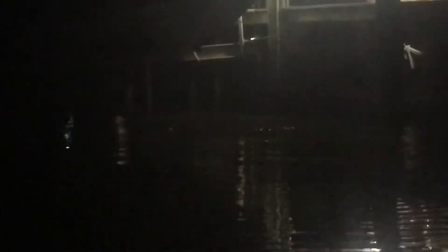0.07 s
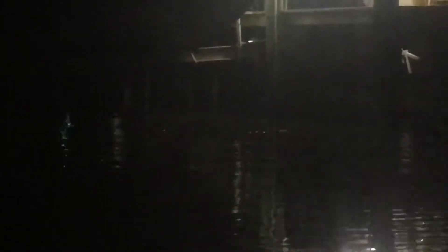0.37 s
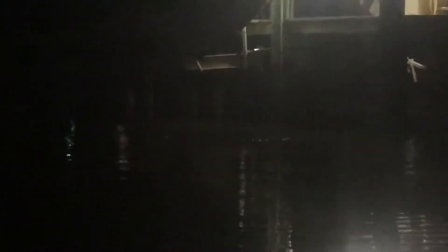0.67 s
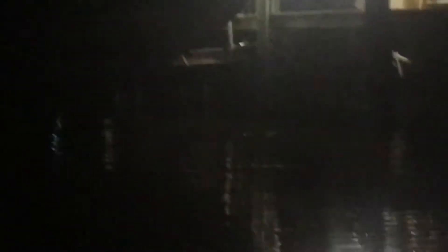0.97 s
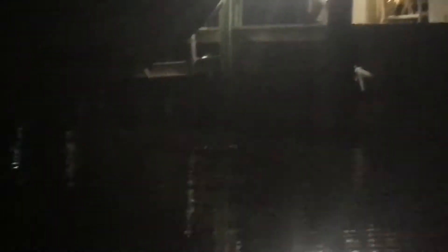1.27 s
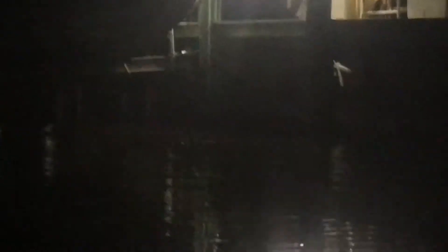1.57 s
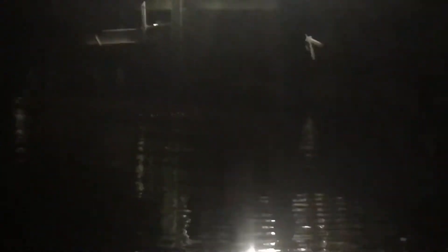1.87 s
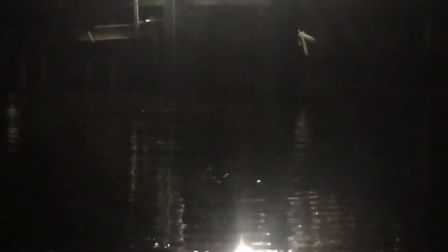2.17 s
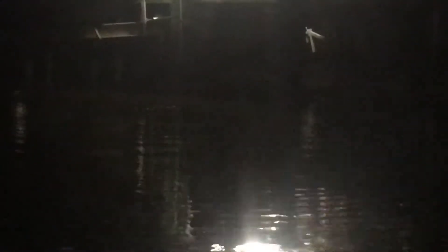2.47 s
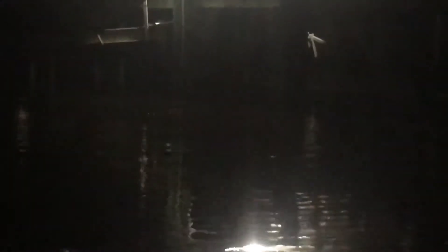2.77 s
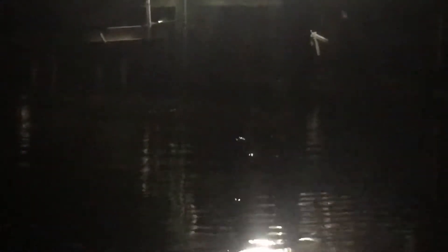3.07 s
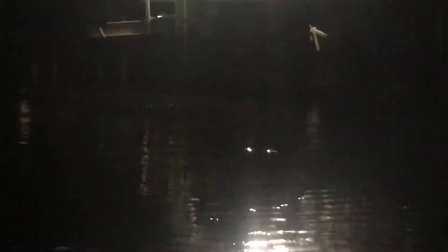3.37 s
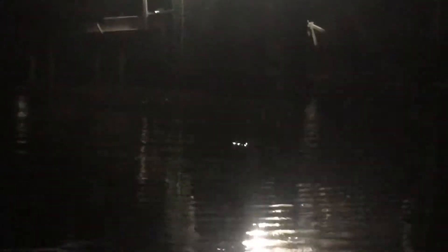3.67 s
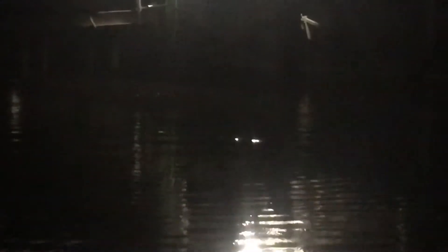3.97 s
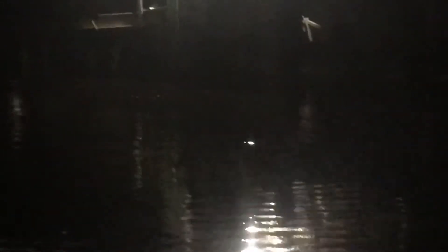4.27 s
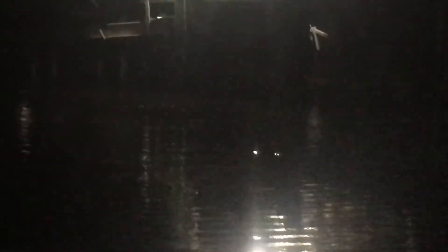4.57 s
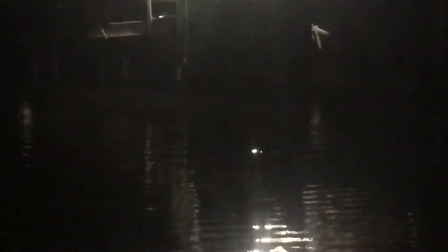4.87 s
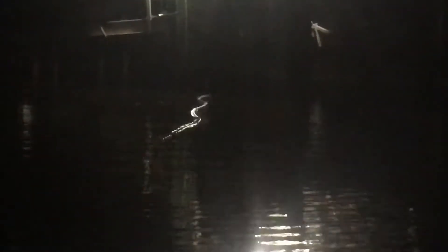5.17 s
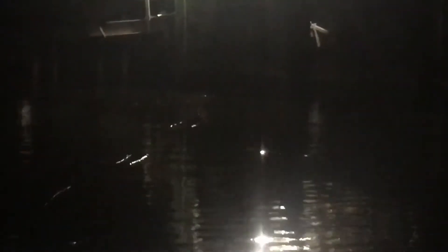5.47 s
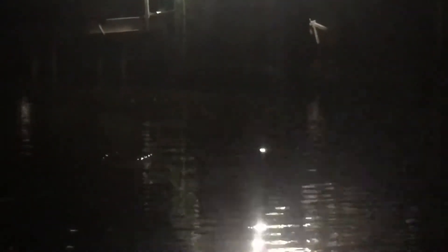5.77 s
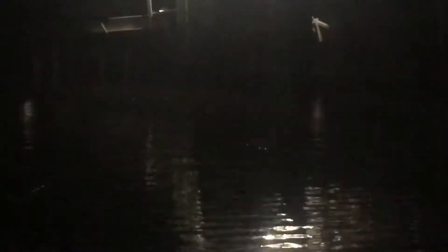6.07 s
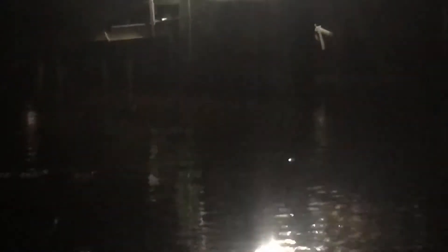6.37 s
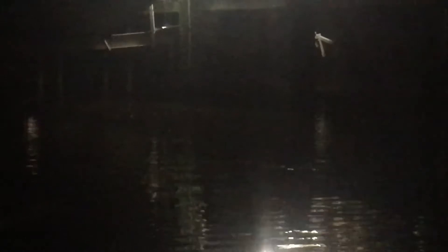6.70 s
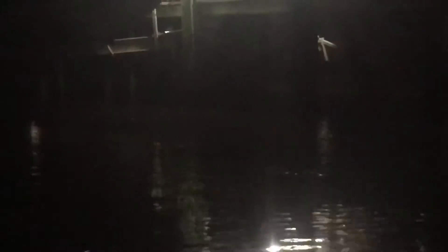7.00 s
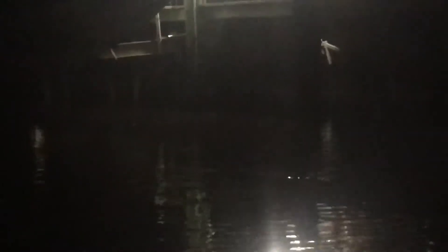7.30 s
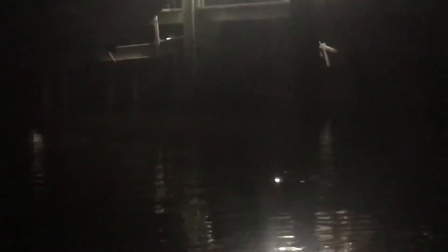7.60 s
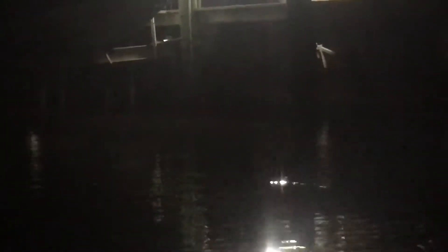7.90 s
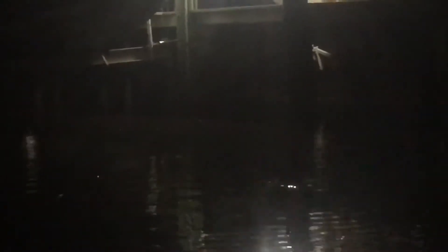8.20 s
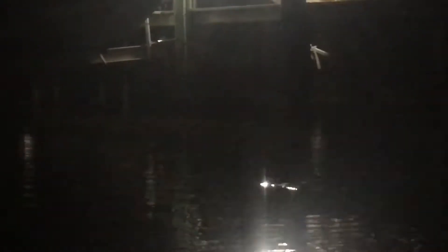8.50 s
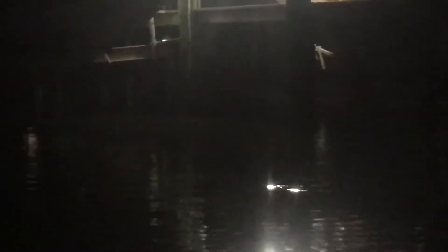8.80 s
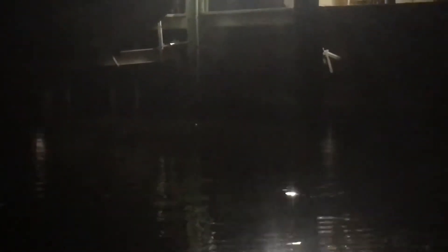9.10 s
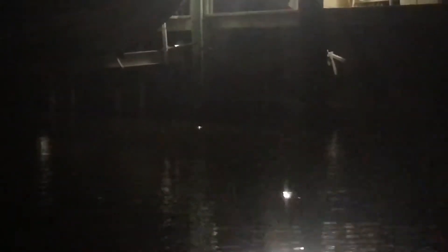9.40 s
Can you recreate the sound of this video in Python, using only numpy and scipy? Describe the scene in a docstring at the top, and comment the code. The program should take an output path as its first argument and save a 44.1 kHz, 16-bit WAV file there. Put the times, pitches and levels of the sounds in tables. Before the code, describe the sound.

A quiet night beside calm water, with a low, gently swelling distant rumble, faint hum and microphone hiss throughout. For the first 1.8 seconds fingers rub, bump and knock on the hand-held microphone; a sharp knock at about 1.15 seconds is by far the loudest sound. From 1.5 seconds a fly line swishes softly through the air, with a very faint hiss through the rod's rings. The rod gives a low whoosh at 2.3 seconds, followed by the line's airy rush. More swishes come between 3.2 and 3.6 seconds. At 4 seconds the rod whooshes again and the line shoots out with a short, rising, breathy whistle. Faint tackle ticks and light water pats then scatter through the rest, while a far drone swells slightly, fading after 7 seconds. Dull hand bumps return from 6.3 to 7 seconds, and one faint, quick swish passes near 9.4 seconds.

```python
"""Fly casting at night beside calm water. First, fingers bump, rub and knock on the hand-held camera.
From 1.5 s the line swishes and hisses through the rod's rings, and the rod whooshes at 2.3 s and 4 s:
both shed little whirls of air, which whistle higher the faster they move. Then the line shoots out,
faint ticks begin and a far drone swells. The hand shifts again at 6-7 s; a last swish comes near 9.4 s.
Under it all lie a low distant rumble, a faint hum and microphone hiss."""
import sys
import numpy as np
from scipy import signal
from scipy.fft import rfft, irfft
from scipy.io import wavfile
from scipy.ndimage import map_coordinates

SR = 44100
rng = np.random.default_rng(int(sys.argv[2]) if len(sys.argv) > 2 else 0)


def materialize(psi):
    """Save the field psi as 16-bit PCM at rate SR to the path in sys.argv[1].

    A 1-D psi becomes a single channel; in a 2-D psi each row is a channel.
    """
    bounded = np.clip(np.atleast_2d(psi).T, -1, 1)
    quanta = np.round(bounded * 32767).astype(np.int16)
    wavfile.write(sys.argv[1], SR, quanta)


N = 425565
T = np.arange(N) / SR

# forward strokes of the rod, at top speed: t/s, f/Hz, level/dB
FORWARD_STROKES = [(2.256, 394, -41.5), (4.032, 378, -44.5)]
# parts of the rod, thick to thin: delay/s, pitch ratio, relative level/dB, fade/s, width/share of pitch
ROD_SECTIONS = [(0, 1, 0.5, 0.038, .3), (.004, 1.33, -6.5, 0.076, .34), (.012, 2.75, -11.5, .06, 0.94),
                (.06, 5.4, -25, .06, .7)]
# the line whipping past, at its closest: t/s, rise/s, f/Hz, glide/(octaves per s), level/dB
LINE_SWEEPS = [(1.55, 0.051, 1300, 10, -51.5), (2.355, 0.059, 1306, 4, -51),
               (3.25, .055, 1197, 13.5, -53.5), (3.278, .026, 2196, 2.5, -57),
               (3.47, 0.04, 2590, 11.5, -66), (3.54, 0.045, 3510, 2, -71), (4.137, .045, 1297, 10.5, -58),
               (4.585, .055, 3450, -5, -73), (9.352, 0.026, 1103, 27.5, -60)]
# loops of line unrolling: t/s, rise/s, fade/s, f/Hz, glide/(octaves per s), level/dB
LINE_LOOPS = [(1.745, 0.13, 0.15, 1272, 1.44, -59.5), (2.489, 0.088, 0.17, 1449, 1, -57.5),
              (3.17, .21, 0.17, 1520, 0.72, -61.5), (3.48, 0.16, 0.17, 1559, -1.1, -60.5),
              (3.54, 0.056, .08, 725, -1.5, -65), (4.48, 0.097, 0.15, 1422, .6, -60.5)]
# whistle of the line shooting out on the last cast: t/s, f/Hz, level/dB
SHOOT_WHISTLE = [(4.19, 1343, -66), (4.258, 1265, -50.5), (4.33, 1346, -49.5), (4.41, 1812, -58.5),
                 (4.53, 2695, -81)]
# peaks in the hiss of the guides (the rings on the rod): f/Hz, width/Hz, relative level/dB
GUIDE_PEAKS = [(1480, 1500, 13), (2970, 3300, 3), (5730, 890, 10.5), (8250, 2400, 6.5), (9800, 1400, -32),
               (12300, 2700, -2)]
# pulls of line through the guides: t/s, length/s, level/dB
LINE_PULLS = [(1.16, 0.17, -71), (2.31, 0.16, -68), (2.56, .42, -67), (3.07, 0.21, -72),
              (3.45, 0.24, -74.5), (4.06, 0.033, -68), (4.6, 0.21, -71.5)]
# zips as the line speeds up or slows in the guides: t/s, length/s, start f/Hz, end f/Hz, level/dB
LINE_ZIPS = [(1.784, 0.08, 10000, 8000, -73), (2.315, 0.058, 8050, 8950, -65.5),
             (2.425, 0.15, 10500, 5670, -69.5), (3.544, 0.14, 5840, 4830, -73),
             (3.58, 0.13, 10100, 8450, -72), (4.141, 0.035, 7900, 3200, -68)]

# fingertips dragging on the camera case: t/s, length/s, level/dB
FINGER_RUBS = [(.92, 0.126, -52), (1.045, 0.1, -46), (1.1265, 0.028, -43), (1.213, 0.034, -48)]
# tone of the rubbing fingertips: f/Hz, relative level/dB
FINGER_TONE = [(250, -21), (400, -13.5), (520, -0.5), (660, -4.5), (830, -15), (1120, -28), (1500, -7.5),
               (1950, -12), (2550, -19), (4100, -21.5), (6000, -26), (9400, -32), (15000, -54.5)]
# the palm shifting: t/s, length/s, rub level/dB, judder level/dB, rate/(slips per s), firmness f/Hz
PALM_SHIFTS = [(0.223, 0.042, -60.5, -42, 30, 250), (0.611, 0.35, -56, -38, 35, 266),
               (1.565, 0.25, -65, -40.5, 27, 195), (6.328, .09, -67, -48, 29, 199),
               (6.842, 0.13, -62.5, -39.5, 31, 200)]
# tone of the rubbing palm: f/Hz, relative level/dB
PALM_TONE = [(70, -6), (130, 3), (300, 7), (550, -4.5), (800, -61), (2500, -60)]
# knocks on the case: t/s, level/dB, brightness/(dB per octave)
CASE_KNOCKS = [(0.584, -45, -3), (0.6967, -27, -7.5), (0.858, -29, -20), (1.0225, -31.5, -4.5),
               (1.037, -26.5, -0.5), (1.081, -64, 8), (1.1268, -20.5, -3.5), (1.1527, -7.5, 0.5),
               (1.2457, -29, -2), (1.741, -35, -6.5), (6.601, -41, -21)]
# notes at which the case rings: f/Hz, relative level/dB, time to fade by 60 dB/s
CASE_NOTES = [(506, -3.5, 0.032), (655, -6, 0.012), (910, -18.5, 0.023), (1560, -3.5, 0.0042),
              (2040, -6.5, 0.0076), (3150, -7.5, 0.0049), (4240, -9, 0.0022), (7170, -18.5, 0.0027),
              (11300, -21, 0.0012)]
# single bumps of the hand (firmer is brighter): t/s, level/dB, firmness f/Hz
HAND_BUMPS = [(0.2265, -34, 290), (.385, -33.5, 149), (0.584, -28, 370), (0.853, -37, 164),
              (1.02, -39.5, 264), (1.149, -38, 256), (1.486, -36.5, 111), (3.198, -35, 473),
              (3.517, -43.5, 240), (4.673, -42, 220), (6.362, -36, 158), (6.519, -40, 119),
              (6.649, -35.5, 148), (6.735, -38, 160), (6.876, -30.5, 223), (7, -36.5, 137)]

# dry ticks of the fishing tackle: t/s, level/dB, relative snap level/dB
TACKLE_TICKS = [(1.407, -58, 0), (3.944, -56.5, -7), (4.215, -53, -11), (5.212, -58.5, -4),
                (5.513, -55, -9), (5.815, -59, -4), (6.1123, -52.5, -5.5), (6.393, -53, -10),
                (6.627, -59, -13), (6.934, -55, -9), (7.913, -56.5, -11), (8.212, -56, -6),
                (8.378, -61, -4), (9.413, -56, -13)]
# soft pats of line and water: t/s, level/dB, f/Hz, decay/s
WATER_PATS = [(0.3697, -49.5, 1790, 0.0027), (3.048, -50, 1810, 0.0029), (4.792, -48, 1480, .012),
              (4.7948, -53.5, 2830, 0.011), (6.422, -47, 1780, 0.0054), (6.435, -61, 1820, 0.058),
              (7.004, -62, 1800, .013), (9.206, -59, 1620, 0.016), (9.225, -57, 780, 0.0094)]
# tone of the low rumble: f/Hz, relative level/dB
RUMBLE_TONE = [(20, -33.5), (32, -9), (43, 1), (60, 0), (85, -8.5), (120, -12.5), (180, -24.5), (400, -50),
               (1000, -68)]
# swells of that rumble: t/s, half length/s, added level/dB
RUMBLE_SWELLS = [(.2, .2, 6.5), (0.727, 0.34, 4), (1.493, 0.16, 12), (2.05, 0.2, 6.5), (2.703, 0.22, 5),
                 (3.687, 0.12, 7.5), (4.374, 0.046, 6), (6.8, .3, 4.5), (7.72, 0.13, 7.5), (8.455, 0.31, 4),
                 (9.348, 0.25, 4.5)]
# tone of the far-off low noise: f/Hz, relative level/dB
DISTANT_TONE = [(70, 3.5), (130, 2), (190, -3), (280, -4.5), (340, -5), (430, -19), (800, -31), (3000, -61)]
# loudness of the far-off drone: t/s, level/dB
DRONE_LEVELS = [(0, -86), (4.1, -70), (4.4, -60), (5.5, -61.5), (7, -61), (8.2, -71.5), (9.65, -76.5)]
# tone of the microphone hiss: f/Hz, relative level/dB
HISS_TONE = [(300, 3.5), (550, 3), (850, -0.5), (1500, 1), (2050, 0), (2700, -9.5), (3700, -9.5),
             (4800, -14.5), (6300, -12.5), (9600, -14), (10500, -19), (11300, -13), (13000, -17),
             (16000, -18.5)]


def rod(rise_s=.036, octaves_per_s=1.7):
    """The rod cuts the air: its thick end gives a low whoomp, the thinner parts a higher, later one."""
    out = np.zeros(N)
    for s, hz, db in FORWARD_STROKES:
        for lag, ratio, section_db, fade_s, width in ROD_SECTIONS:
            whoosh(out, s + lag, rise_s + lag / 2, fade_s, hz * ratio, octaves_per_s, db + section_db,
                   width, rush_db=-17, shapes=(1.33, 1.2))
    return out


def line_sweeps(slack_db=-8.5, slack_glide_share=.35):
    """The tight line whips past and stops short; its slack part glides less, so the pitches fan out."""
    out = np.zeros(N)
    for s, rise_s, hz, glide, db in LINE_SWEEPS:
        tight = (glide, db, .26)  # glide, level, width
        slack = (glide * slack_glide_share, db + slack_db, .36)
        for part in (tight, slack):
            whoosh(out, s, rise_s, .9 * rise_s, hz, *part, rush_db=-5, shapes=(1.1, 3))
    return out


def line_loops():
    """After a stroke, the loop of line unrolls with a long soft rush."""
    out = np.zeros(N)
    for loop in LINE_LOOPS:
        whoosh(out, *loop, width=.32, rush_db=-2, shapes=(3.1, 2.1))
    return out


def line_shoot(fray_db_per_s=45):
    """Let go, the line whistles, rises as its loop speeds up and frays into a rush."""
    out = np.zeros(N)
    times, hz, db = np.transpose(SHOOT_WHISTLE)
    t = np.arange(times[0], times[-1], 1 / SR)
    pitch = np.interp(t, times, hz)
    loudness = gain(np.interp(t, times, db))
    rush_db = -16 + fray_db_per_s * (t - times[0])
    add(out, times[0], air_whirls(pitch, loudness, width=.19, rush_db=rush_db))
    return out


def whoosh(out, s, rise_s, fade_s, hz, glide, db, width, rush_db, shapes):
    """Add one pass through the air to out: it swells and fades while its pitch glides."""
    t = np.arange(-3 * rise_s, 3 * fade_s, 1 / SR)
    pitch = hz * 2 ** np.minimum(glide * t, 1)  # at most one octave above hz
    loudness = gain(db) * swell(t, rise_s, fade_s, *shapes)
    add(out, s + t[0], air_whirls(pitch, loudness, width, rush_db))


def air_whirls(hz, loudness, width, rush_db, gust_db=2, gusts_per_s=70):
    """Whirls of air make a tone that follows the speed; parts moving at other speeds add a broad rush."""
    cycles = np.cumsum(np.clip(hz, 150, 6000)) / SR
    tone = breathy_tone(cycles, width) + .5 * breathy_tone(cycles, 2 * width)
    air = unit(steep_band(rng.standard_normal(2 * SR), hz=3000, width=3000))[:len(hz)]
    rush = breathy_tone(cycles, width=.91) + gain(-13) * air
    gusts = gain(gust_db * wander(T[:len(hz)] * gusts_per_s))  # churning air roughens the sound
    sound = (tone + gain(rush_db) * rush) * gusts
    return loudness * sound / np.sqrt(np.average(sound ** 2, weights=loudness ** 2))


def guides(rough_db=2.5, flutters_per_s=90):
    """The line hisses unevenly through the rings of the rod, and zips when its speed changes."""
    noise = rng.standard_normal(N)
    hiss = gain(-22) * band(noise, hz=5000, width=7000)
    hiss += sum(gain(db) * steep_band(noise, hz, width) for hz, width, db in GUIDE_PEAKS)
    flutter = gain(rough_db * wander(T * flutters_per_s))
    out = unit(hiss * flutter) * slides(LINE_PULLS, attack_s=.013, build_db=3, release_s=.049)
    for s, length, start_hz, end_hz, db in LINE_ZIPS:
        cycles = np.cumsum(np.geomspace(start_hz, end_hz, int(length * SR))) / SR
        add(out, s, gain(db) * np.hanning(len(cycles)) * breathy_tone(cycles, width=.34))
    return out


def rubbing(slip_db=3.5, slips_per_s=600, creep_db=4, creeps_per_s=110):
    """Skin catches and slips on the case: fingertips in quick bright bursts, the palm in slow dull ones."""
    fingers = colour(rng.standard_normal(N) * gain(slip_db * wander(T * slips_per_s)), FINGER_TONE)
    fingers *= slides(FINGER_RUBS, attack_s=.0012, build_db=14.5, release_s=.0054)
    palm = colour(rng.standard_normal(N) * gain(creep_db * wander(T * creeps_per_s)), PALM_TONE)
    palm *= slides([row[:3] for row in PALM_SHIFTS], attack_s=.0021, build_db=-1, release_s=.02)
    return fingers + palm


def knocks(low_cut_hz=330):
    """Each knock rings the case, and a harder one reaches higher notes. So small a body gives no bass."""
    out, t = np.zeros(N), T[:SR // 10]
    for s, db, brightness in CASE_KNOCKS:
        for k, (hz, note_db, ring_s) in enumerate(CASE_NOTES):
            octaves_up = np.log2(hz / CASE_NOTES[0][0])
            size = gain(db + note_db + brightness * octaves_up)
            ring = np.sin(2 * np.pi * hz * t) * np.exp(-np.log(1000) * t / ring_s)
            add(out, s, (-1) ** k * size * ring)  # neighbouring notes swing opposite ways
    return keep_side(out, "high", low_cut_hz, order=2)


def bumps(spread_octaves=.46, jitter_s=.002, scatter_db=.5):
    """Single bumps of the hand, and a judder of small ones while the palm sticks and slips."""
    out = np.zeros(N)
    for s, db, firm_hz in HAND_BUMPS:
        add(out, s, thud(db, firm_hz))
    for s, length, _, db, rate, firm_hz in PALM_SHIFTS:
        slip_times = s + np.arange(0, length, 1 / rate)
        for slip_s, (later, louder, firmer) in zip(slip_times, rng.standard_normal((32, 3))):
            slip = thud(db + scatter_db * louder, firm_hz * 2 ** (spread_octaves * firmer))
            add(out, slip_s + jitter_s * later, slip)
    return out


def thud(db, firm_hz, low_cut_hz=62):
    """A push on the case swings from a quick tap down into the bass and soon dies away."""
    push = np.ones(SR // 6)
    swing = keep_side(push, "high", low_cut_hz, order=7)
    sound = keep_side(swing, "low", firm_hz, order=4)
    return gain(db) * sound / np.abs(sound).max()


def ticks_and_pats(snap_db_per_octave=8):
    """The tackle always ticks at one pitch; pats on the water are softer, the higher ones crisper."""
    out = np.zeros(N)
    for s, db, snap_db in TACKLE_TICKS:
        add(out, s, tap(db, hz=2150, decay_s=.003, snap_db=snap_db))
    for s, db, hz, decay_s in WATER_PATS:
        octaves_up = np.log2(hz / WATER_PATS[0][2])
        add(out, s, tap(db, hz, decay_s, snap_db=-17 + snap_db_per_octave * octaves_up))
    return out


def tap(db, hz, decay_s, snap_db, rise_s=.00025):
    """One light tap: a soft ring around one pitch, with a brighter snap."""
    t = T[:SR // 6]
    ring = unit(steep_band(rng.standard_normal(len(t)), hz, width=.33 * hz))
    snap = unit(band(rng.standard_normal(len(t)), hz=4500, width=6500))
    loudness = gain(db) * np.exp(-t / decay_s) * (1 - np.exp(-t / rise_s))
    return loudness * (ring + gain(snap_db) * snap)


def faint_ticks(count=40, first_s=4, scatter_db=4, decay_s=.0081):
    """Tiny uneven ticks, barely above the hiss, from the last cast on."""
    out, t = np.zeros(N), T[:SR // 50]
    for when, size in rng.random((count, 2)):
        tick = rng.standard_normal(len(t)) * np.exp(-t / decay_s)
        add(out, first_s + when * (T[-1] - first_s), gain(-68 + scatter_db * size) * tick)
    return band(out, hz=4200, width=4800) + gain(13) * band(out, hz=2100, width=500)


def night(rumble_db=-55, distant_db=-61.5, hiss_db=-67.5, drone_hz=215):
    """Swelling rumble, far-off low noise, microphone hiss, a far drone and the hum of mains power."""
    swells_db = sum(db * swell(T - s, half, half) for s, half, db in RUMBLE_SWELLS)
    rumble = colour(rng.standard_normal(N), RUMBLE_TONE) * gain(rumble_db + swells_db)
    distant = colour(rng.standard_normal(N), DISTANT_TONE) * gain(distant_db + wander(T * 4))
    hiss = colour(rng.standard_normal(N), HISS_TONE) * gain(hiss_db)
    drone_db = np.interp(T, *np.transpose(DRONE_LEVELS))
    drone = breathy_tone(T * drone_hz, width=.35) * gain(drone_db)
    hum = np.zeros(N)
    for hz, db in [(60, -59), (300, -69)]:
        loudness = gain(db + 2 * wander(T * 2))
        hum += loudness * np.sin(2 * np.pi * hz * T + .5 * wander(T * 2))
    return rumble + distant + hiss + drone + hum


def slides(rows, attack_s, build_db, release_s):
    """Loudness of sliding contacts (t/s, length/s, level/dB): each starts, nears its level and lets go."""
    out = np.zeros(N)
    for s, length, db in rows:
        t = T[:int((length + 5 * release_s) * SR)]
        build = gain(db - build_db * np.maximum(1 - t / length, 0))
        attack = 1 - np.exp(-t / attack_s)
        release = np.exp(-np.maximum(t - length, 0) / release_s)
        add(out, s, build * attack * release)
    return out


def swell(t, rise_s, fade_s, rise_shape=2, fade_shape=2):
    """A rise to one at t = 0 and a fade after it; a higher shape makes that side squarer."""
    return np.exp(-np.where(t < 0, np.abs(t / rise_s) ** rise_shape, np.abs(t / fade_s) ** fade_shape))


def breathy_tone(cycles, width):
    """A tone whose strength and timing drift every 1 / width cycles; wider sounds more like noise."""
    angle = 2 * np.pi * cycles
    return wander(cycles * width) * np.cos(angle) + wander(cycles * width) * np.sin(angle)


def wander(steps):
    """A smooth random curve, about one in size, with a new value at every whole step."""
    return map_coordinates(rng.standard_normal(8192), [steps], order=3, mode="wrap")


def colour(x, points):
    """Shape a sound's tone by (f/Hz, level/dB) points, then scale it to strength one."""
    hz, db = np.transpose(points)
    f = np.maximum(np.fft.rfftfreq(N, 1 / SR), 1)
    curve = gain(np.interp(np.log(f), np.log(hz), db))
    bass_cut = np.minimum(f / hz[0], 1) ** 2
    return unit(irfft(rfft(x) * curve * bass_cut, N))


def band(x, hz, width):
    """Keep the sound near one pitch; the width is in Hz."""
    return signal.lfilter(*signal.iirpeak(hz, hz / width, fs=SR), x)


def steep_band(x, hz, width):
    """The same band twice, so less gets through at the sides."""
    return band(band(x, hz, width), hz, width)


def keep_side(x, side, hz, order):
    """Keep the "low" or "high" side of hz; a higher order cuts more sharply."""
    return signal.sosfilt(signal.butter(order, hz, side, fs=SR, output="sos"), x)


def gain(db):
    """Turn decibels into a multiplier."""
    return 10 ** (np.asarray(db) / 20)


def unit(x):
    """Scale to an average strength (rms) of one."""
    return x / np.sqrt(np.mean(x ** 2))


def add(out, s, sound):
    """Mix a sound in, starting at s seconds."""
    i = max(int(s * SR), 0)
    out[i:i + len(sound)] += sound[:max(N - i, 0)]


def scene():
    """The cast, the hand on the camera and the night, on one microphone."""
    cast = rod() + line_sweeps() + line_loops() + line_shoot() + guides()
    hand = rubbing() + knocks() + bumps()
    return (cast + hand + ticks_and_pats() + faint_ticks() + night())[None]


def record(dry):
    """The camera cuts the highest treble, above 15800 Hz."""
    return signal.sosfilt(signal.ellip(10, .2, 70, 15800, fs=SR, output="sos"), dry)


dry = scene()
out = record(dry)
materialize(out)
```